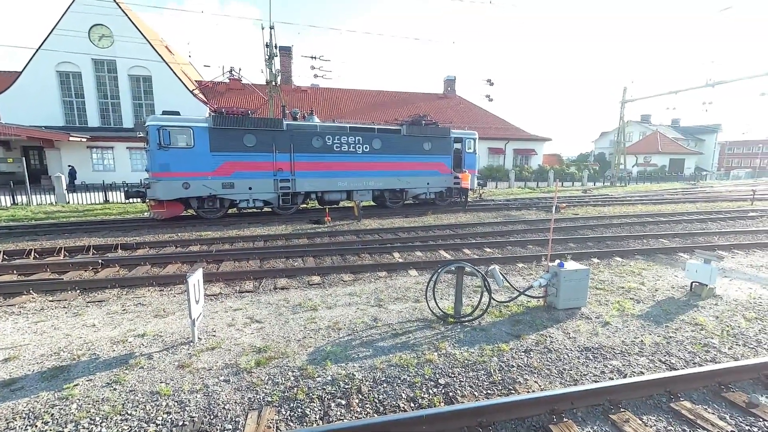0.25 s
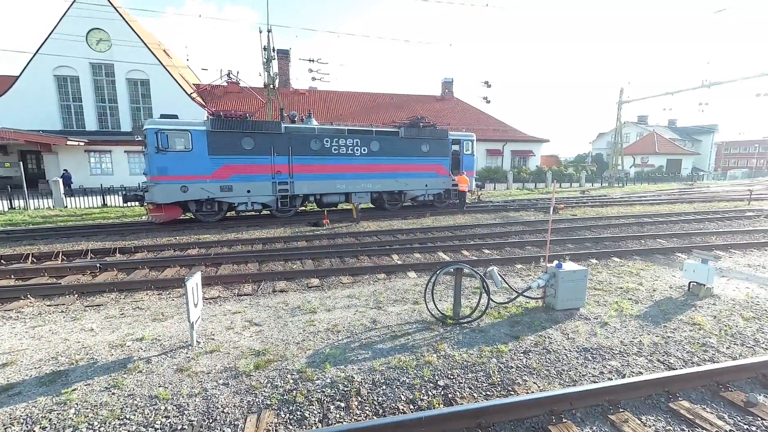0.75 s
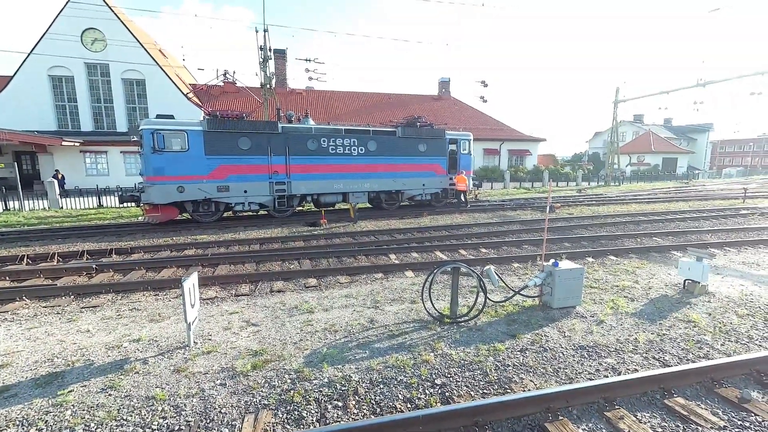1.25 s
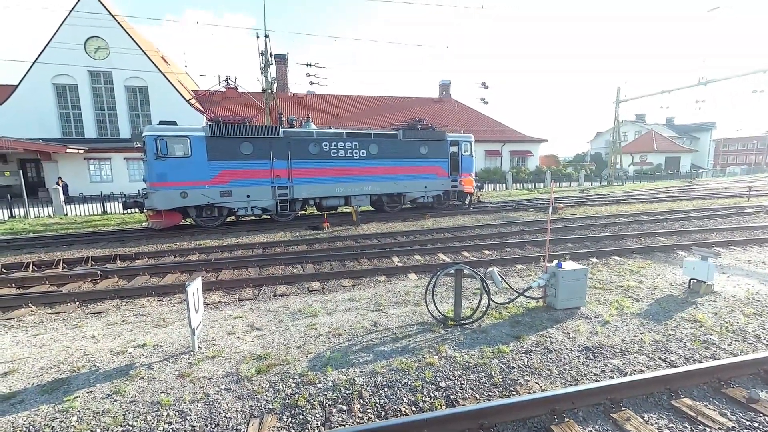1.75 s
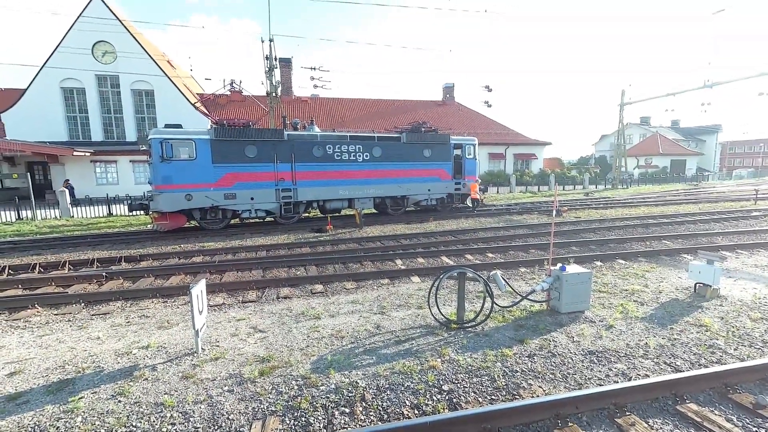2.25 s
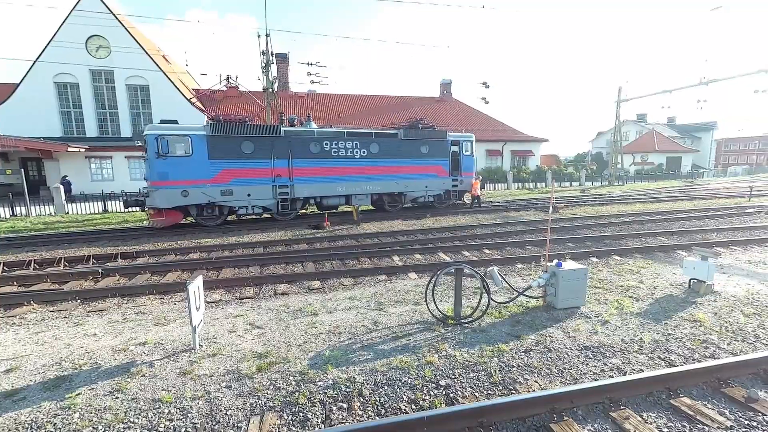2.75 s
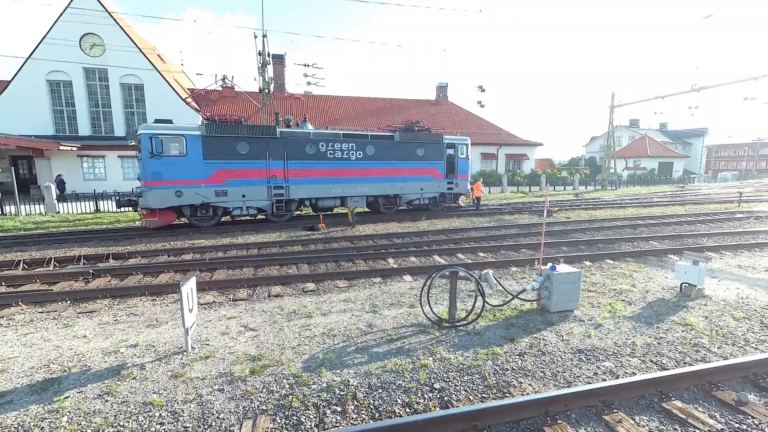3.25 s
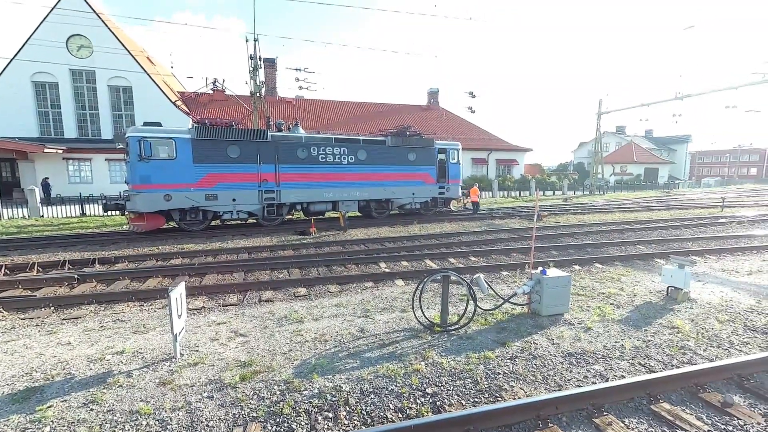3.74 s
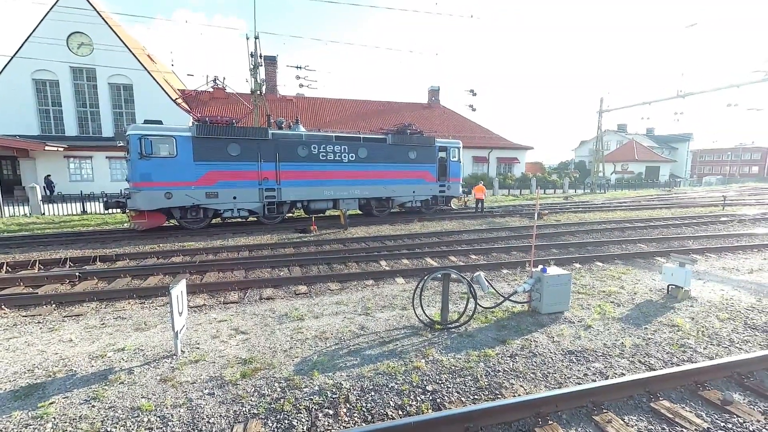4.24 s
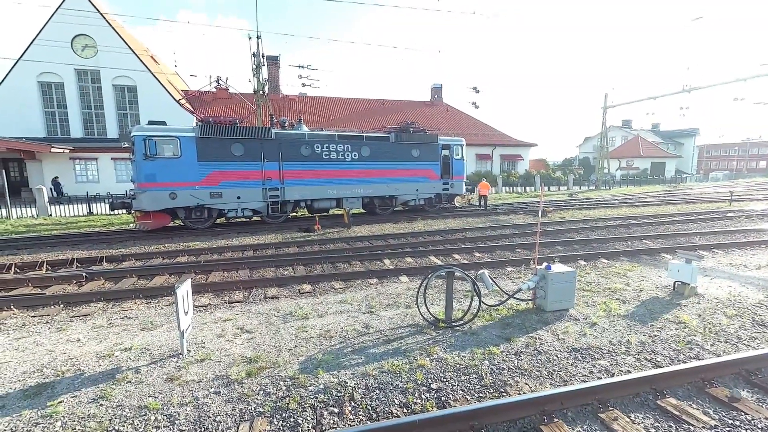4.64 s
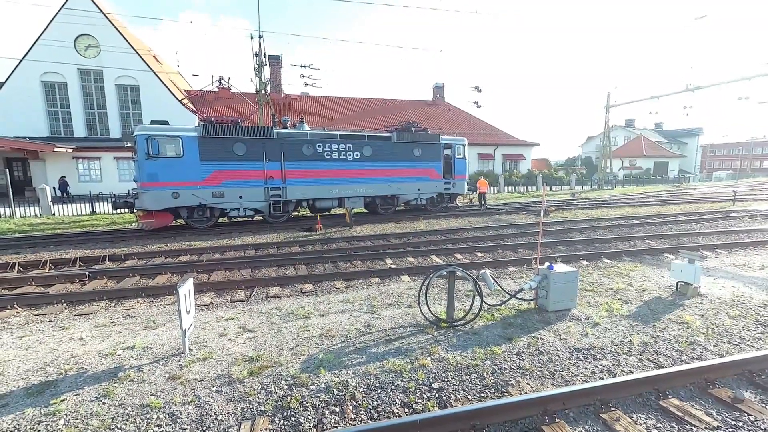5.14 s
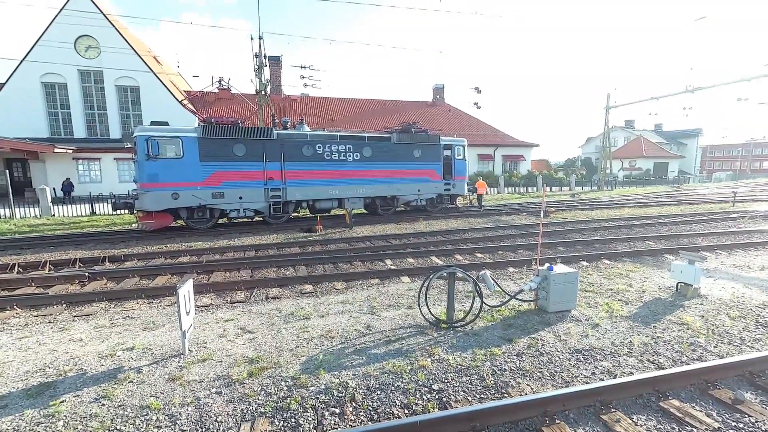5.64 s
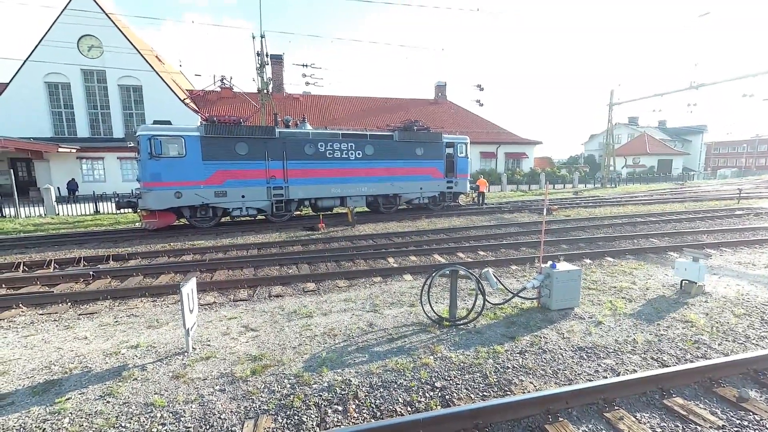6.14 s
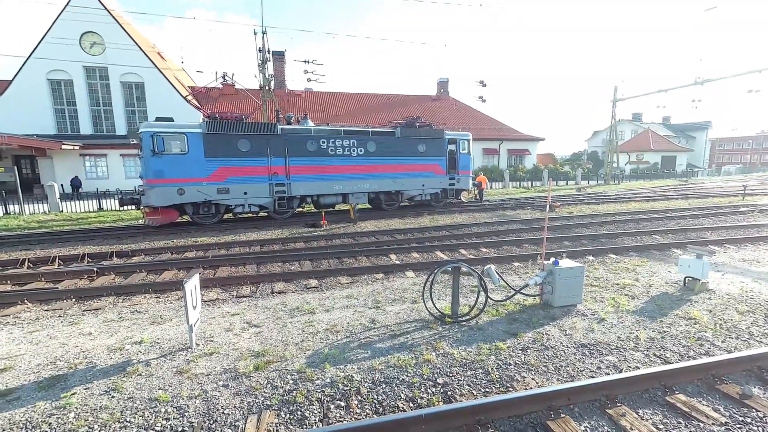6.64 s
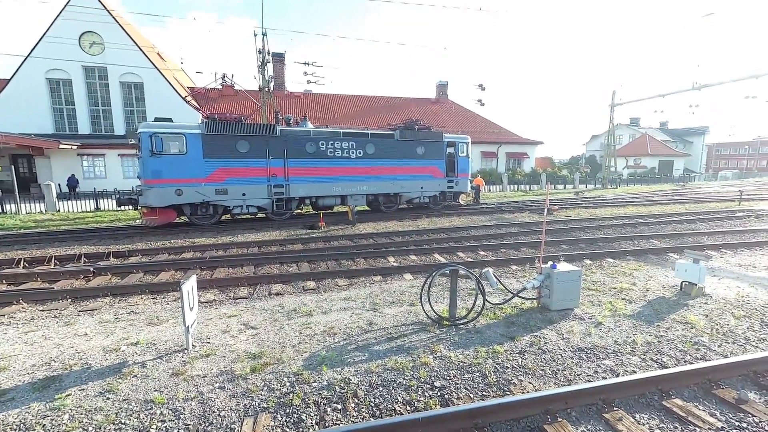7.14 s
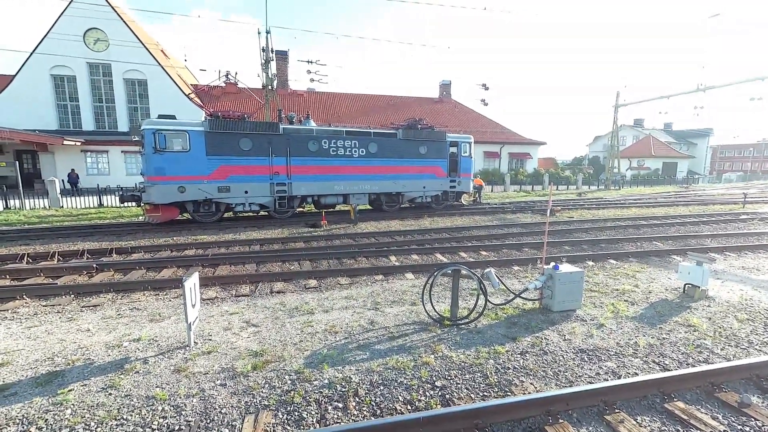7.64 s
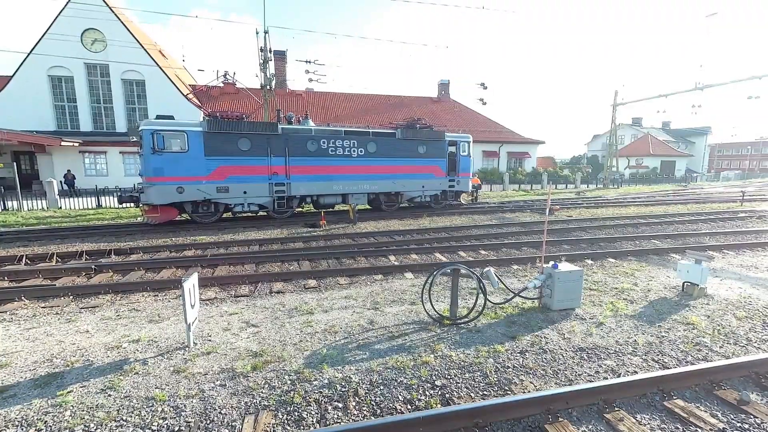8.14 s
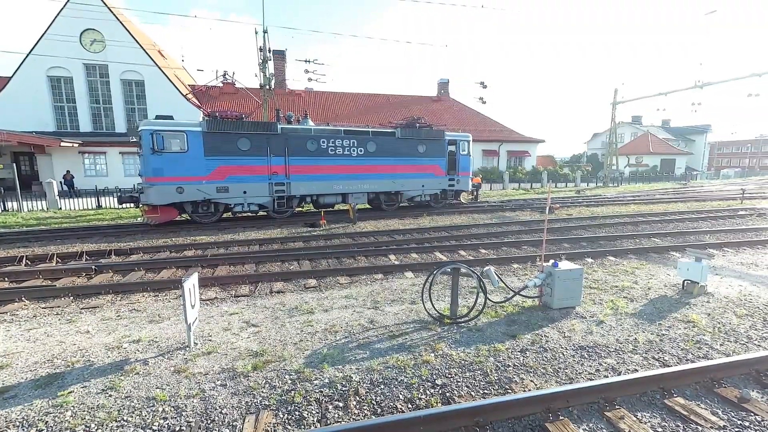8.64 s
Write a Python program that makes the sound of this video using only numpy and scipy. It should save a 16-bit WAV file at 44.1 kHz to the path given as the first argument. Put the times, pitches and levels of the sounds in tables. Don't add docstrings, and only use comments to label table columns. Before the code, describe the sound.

A parked electric locomotive's cooling fans roar steadily while an unseen braking train squeals to a stop and wind gusts batter the microphone.

```python
import sys
import numpy as np
from scipy import signal
from scipy.fft import irfft, next_fast_len
from scipy.io import wavfile
from scipy.ndimage import uniform_filter1d

SR = 44100
rng = np.random.default_rng(int(sys.argv[2]) if len(sys.argv) > 2 else 0)


def bounce(signal):
    frames = np.transpose(np.atleast_2d(signal))
    limited = np.clip(frames, -1, 1)
    pcm = np.round(limited * 32767).astype(np.int16)
    wavfile.write(sys.argv[1], SR, pcm)


def rack_gain(trim_db):
    fader = np.asarray(trim_db, float)
    return 10 ** (fader / 20)


N = 392049
T = np.arange(N) / SR
M = next_fast_len(N)
HZ = np.arange(M // 2 + 1) * SR / M + 1e-3
PORT_LAG_S = .0002
BASS_LAG_SHARE = 0.32

# f/Hz, likeness (0-1)
ALIKE = [(60, 0.04), (130, 0.63), (300, 0.95), (700, 0.97), (1400, 0.7), (2500, 0.02), (8000, 0.11)]


def over_hz(points):
    hz, value = np.transpose(points)
    return np.interp(np.log(HZ), np.log(hz), value)


def noise(gain):
    chance = rng.standard_normal(len(HZ)) + 1j * rng.standard_normal(len(HZ))
    return chance * gain * M / np.sqrt(4 * np.sum(gain ** 2))


def walk(rate_hz):
    hold = int(SR / rate_hz)
    steps = np.repeat(rng.standard_normal(N // hold + 1), hold)
    slewed = uniform_filter1d(uniform_filter1d(steps, hold), hold)
    return 1.7 * slewed[:N]


def resonance(hz, width_hz):
    return 1 / (1 + ((HZ - hz) / (width_hz / 2)) ** 2)


def ports(spectrum, gain, likeness, left_db):
    # f/Hz, level/dB
    shade = [(100, -2), (700, 2.5), (1400, 0), (1750, -8), (2400, -11.5), (4400, -3.5), (8000, -7.5),
             (15000, -7)]
    alike = np.clip(likeness, 0, 1)
    from_right = 1 / (1 + (1800 / HZ) ** 4)
    lag_s = PORT_LAG_S * (BASS_LAG_SHARE + (1 - BASS_LAG_SHARE) * from_right)
    delayed = spectrum * np.exp(-2j * np.pi * HZ * lag_s)
    left = alike * delayed + np.sqrt(1 - alike ** 2) * noise(gain)
    tilt = rack_gain((over_hz(shade) + left_db) / 2)
    norm = 2 / (tilt + 1 / tilt) * np.sqrt(2 / (1 + alike))
    return irfft(np.array([left * tilt, spectrum / tilt]) * norm, M)[:, :N]


def tone(table, flutter_db, wobble_hz, left_db, lag_s=PORT_LAG_S):
    s, hz, db = np.transpose(table)
    on = uniform_filter1d(((T > s[0]) & (T < s[-1])) * 1., size=2000)
    pitch_hz = np.interp(T, s, hz) + wobble_hz * walk(15)
    phase = 2 * np.pi * np.cumsum(pitch_hz) / SR
    size = np.sqrt(2) * on * rack_gain(np.interp(T, s, db) + flutter_db * walk(8.1))
    left = rack_gain(left_db) * np.sin(phase - 2 * np.pi * hz[0] * lag_s)
    return size * np.array([left, np.sin(phase)]) * 2 / (1 + rack_gain(left_db))


def airflow(points, db, flicker_db, swell_db):
    colour, out = rack_gain(over_hz(points)), 0
    for centre in 30 * 2. ** np.arange(10):
        gain = colour * np.cos(np.pi / 2 * np.clip(np.log2(HZ / centre), -1, 1))
        share = np.sqrt(np.sum(gain ** 2) / np.sum(colour ** 2))
        band = ports(noise(gain), gain, over_hz(ALIKE), 0)
        out = out + share * band * rack_gain(swell_db + flicker_db * walk(8))
    return out * rack_gain(db)


def blower():
    # f/Hz, level/dB per Hz
    roar = [(18, -68.5), (30, -34), (122, -9.5), (150, -6), (184, -4), (238, -3), (288, 0), (427, -9),
            (690, -11.5), (805, -7), (939, -16.5), (1170, -20), (1800, -31), (2340, -54.5), (3960, -120)]
    # f/Hz, level/dB per Hz
    hiss = [(1000, -27), (1700, -6.5), (1750, -19.5), (2260, -4.5), (2780, -14.5), (3700, -15.5),
            (4660, -21.5), (5310, -25), (6940, -28.5), (8270, -27), (11000, -31), (12200, -34),
            (15500, -39.5)]
    # f/Hz, width/Hz, level/dB
    ducts = [
        (241.8, 82, -26),
        (164.5, 27, -33.5),
        (611, 130, -33.5),
        (1630, 27, -51.5),
        (3480, 120, -66.5),
        (1960, 92, -56),
    ]
    # t/s, level/dB
    blade = [
        (0, -44),
        (.6, -38),
        (1, -30),
        (1.4, -33),
        (4.6, -35),
        (5.9, -32.5),
        (6.3, -34.5),
        (8.3, -32),
        (8.89, -40),
    ]
    swell_db = 0.22 * walk(0.86)
    out = airflow(roar, db=-23.5, flicker_db=1.22, swell_db=swell_db)
    out = out + airflow(hiss, db=-47.5, flicker_db=0.87, swell_db=swell_db)
    for hz, width_hz, db in ducts:
        gain = resonance(hz, width_hz)
        out = out + ports(noise(gain), gain, over_hz(ALIKE), 0) * rack_gain(db + 1.47 * walk(5))
    blade_hz = 818.3
    steady = [(s, blade_hz, db) for s, db in blade]
    return out + tone(steady, flutter_db=1.2, wobble_hz=.5, left_db=1.2, lag_s=BASS_LAG_SHARE * PORT_LAG_S)


def follow(level_db, share, dies_s, dies_db_per_s):
    # t/s, level/dB
    effort = [
        (0, -5),
        (1.1, -3),
        (1.6, -1),
        (2.1, -2),
        (2.9, 0.3),
        (3.5, -0.5),
        (4, -5.5),
        (4.6, -9),
        (6, -21),
    ]
    return level_db + share * np.interp(T, *np.transpose(effort)) - dies_db_per_s * np.maximum(T - dies_s, 0)


def wheels(rings, bed, bed_db, left_db):
    gain = rack_gain(over_hz(bed))
    out = ports(noise(gain), gain, .5, left_db) * rack_gain(bed_db + .9 * walk(6))
    for hz, width_hz, db, start, end in rings:
        gain = resonance(hz, width_hz)
        sings = np.clip(np.minimum(T - start, end - T) / .15 + .5, 0, 1)
        patchy_db = 1.2 * walk(4) + 1.8 * walk(14) - 10 * (1 - sings)
        out = out + ports(noise(gain), gain, 0.22, left_db) * rack_gain(db + patchy_db)
    return out / np.std(out.mean(axis=0))


def train():
    # f/Hz, width/Hz, level/dB, from t/s, to t/s
    low_rings = [
        (1370, 70, -2.5, 0, 4),
        (1450, 30, -8, 0, 4),
        (2040, 45, -9, 0, 4.3),
        (950, 90, -1, 0, 4),
    ]
    mid_rings = [(4020, 50, -1, 1.25, 2.1), (4030, 55, -2, 2.8, 3.7), (5490, 40, -7, 0, 3.9),
                 (5630, 70, -4, 0, 3.9), (5820, 65, -3.5, 0, 4.8), (5970, 45, -7, 1.2, 4.8),
                 (6220, 60, -9, 1.2, 3.6), (6530, 50, -7, 1.2, 3.5), (6615, 50, -7, 1.2, 3.5),
                 (7590, 35, -8, 0, 3.9), (7880, 50, -7, 1.2, 3.9), (8020, 60, -7, 0, 3.9),
                 (8190, 85, -4, 0, 4.7), (8600, 110, -6, 4.6, 6)]
    top_rings = [(9050, 60, -8, 1.3, 2.2), (10100, 200, -3, 1.2, 3.6), (10550, 200, -6, 1.2, 3.6),
                 (10800, 60, -7, 0, 3.6), (11000, 110, -4, 0, 3.9), (11150, 130, -1, 4, 4.9),
                 (11600, 90, -6, 3.7, 4), (13400, 200, -3, 3.7, 4.75), (14200, 300, -6, 3.6, 4)]
    # t/s, level/dB
    squeal = [
        (.06, -46.5),
        (1.1, -48.5),
        (1.6, -42.5),
        (2.2, -40.5),
        (2.32, -47),
        (2.8, -47),
        (3.72, -40.5),
        (3.78, -49),
        (4.05, -51),
    ]
    # t/s, f/Hz, level/dB
    second_squeal = [
        (2.3, 2466, -55),
        (2.6, 2428, -47),
        (3, 2440, -47),
        (3.4, 2430, -59),
        (3.85, 2490, -53),
    ]
    low = rack_gain(follow(-40.5, share=0.83, dies_s=7, dies_db_per_s=28))
    mid = rack_gain(follow(-45, share=1.01, dies_s=5.5, dies_db_per_s=4))
    top = rack_gain(follow(-50.5, share=0.96, dies_s=4.5, dies_db_per_s=12.5))
    # f/Hz, level/dB per Hz
    low_bed = [(700, -20), (1300, -1), (2300, -8), (3200, -25), (6000, -60)]
    mid_bed = [(1500, -43), (2700, -27.0), (4000, 0.5), (4400, -7.0), (5300, -4), (5600, 1.5),
               (6900, 1.0), (8300, -0.5), (8800, -12.5), (12000, -42)]
    top_bed = [(6000, -42.5), (8800, -6.0), (9700, -6.5), (10300, -4.5), (11800, -6.0), (15500, -12)]
    out = low * wheels(low_rings, low_bed, bed_db=0, left_db=-1.5)
    out = out + mid * wheels(mid_rings, mid_bed, bed_db=8, left_db=-2.5)
    out = out + top * wheels(top_rings, top_bed, bed_db=6.5, left_db=-4.5)
    out = out * np.clip((6.3 - T) / .4, 0, 1)
    squeal_hz, sag_hz_per_s = 2466, 3.2
    sagging = [(s, squeal_hz - sag_hz_per_s * s, db) for s, db in squeal]
    out = out + tone(sagging, flutter_db=1, wobble_hz=1, left_db=-22)
    return out + tone(second_squeal, flutter_db=2, wobble_hz=2, left_db=-20)


def bells(s, db, ms, steep, rise):
    coarse = T[::32]
    late = (coarse - s[:, None]) * 1000 / ms[:, None]
    shape = np.exp(-np.where(late > 0, late, -late / rise) ** steep)
    power = rack_gain(db[:, None]) ** 2 * shape
    return np.interp(T, coarse, np.sqrt(power.sum(axis=0)))


def eddies(points, even, span_s):
    x = irfft(noise(rack_gain(over_hz(points))), M)[:N]
    power = uniform_filter1d(x ** 2, int(span_s * SR))
    x = x / power ** (np.clip(even, 0, 1) / 2)
    return x / np.std(x)


def wind(puffs, cracks, rasp_db, swirl_db):
    # f/Hz, level/dB per Hz
    buffet_colour = [(25, -39), (60, -13), (110, 0.5), (170, 11.5), (240, 13), (350, 7.5), (500, -7.5),
                     (800, -38.5), (2000, -85.5)]
    rasp_colour = [(200, -14.5), (450, 2.5), (700, -4), (1000, -14), (1500, -34.5), (2500, -40.5),
                   (5000, -48), (15000, -96.5)]
    crack_colour = [(200, -29), (500, -6), (900, 6.5), (1400, -3), (2300, -29), (4000, -51), (15000, -89.5)]
    edge_colour = [(1000, -24), (2600, 2.5), (4000, -9.5), (7000, -15.5), (15000, -32)]
    s, db, ms, swirl_ms = np.transpose(cracks)
    thud = bells(*np.transpose(puffs), steep=3.5, rise=.85)
    crack = bells(s, db, ms, steep=2.5, rise=.4)
    edge = bells(s, -25.5 + 0.7 * db, ms, steep=2.5, rise=.4)
    swirl = bells(s, swirl_db + 0.33 * db, swirl_ms, steep=3.5, rise=.85)
    rasp = np.hypot(rack_gain(rasp_db) * thud, swirl) * rack_gain(2 * walk(60))
    edge = edge * rack_gain(5 * walk(400) - 6)
    push = thud * eddies(buffet_colour, even=0.32, span_s=0.02)
    push = push + rasp * eddies(rasp_colour, even=0.18, span_s=0.0044)
    out = rack_gain(1.0) * push + crack * eddies(crack_colour, even=.8, span_s=.004)
    return out + edge * eddies(edge_colour, even=.5, span_s=.002)


def gusts():
    # t/s, level/dB, half
    # length/ms
    puffs_left = [(0.004, -11, 5), (.031, -14.5, 6), (0.113, -13, 6), (.15, -21, 30), (.338, -16, 6),
                  (0.462, -12, 5.4), (.49, -19, 25), (0.643, -11.5, 16), (0.963, -20, 146),
                  (2.984, -17, 35), (3.074, -17.5, 44), (3.182, -21, 18), (3.569, -14, 11.4),
                  (3.683, -14.5, 29), (3.78, -17.5, 22), (4.001, -21.5, 136), (4.855, -12, 19),
                  (5.346, -22, 35), (6.136, -21, 166)]
    puffs_right = [(0.096, -4, 7.1), (0.15, -16, 26), (0.254, -13.5, 17), (0.49, -16.5, 50),
                   (0.64, -11.5, 32), (0.858, -11, 16), (.898, -13.5, 8.4), (0.932, -3.5, 12.7),
                   (1.015, -12.5, 24), (1.041, -5.5, 9.3), (1.115, -19.5, 43), (1.925, -20.5, 47),
                   (2.309, -3.5, 8.4), (2.39, -8.5, 18), (2.43, -18, 16), (2.59, -13, 5.8),
                   (2.704, -15.5, 9), (2.633, -7, 18), (2.785, -5, 26), (2.989, -16, 22), (3.289, -12, 39),
                   (3.66, -19, 81), (3.916, -7, 17.5), (4.131, -9, 27), (4.265, -17.5, 71),
                   (4.861, -2.5, 7.8), (4.955, -6.5, 62), (5.043, 0.5, 16), (5.112, -6.5, 54),
                  (5.229, -5.5, 65), (5.343, -9, 18), (5.389, -6.5, 8.6), (5.442, -6, 11),
                  (6.109, -4.5, 14), (6.173, 0.5, 12), (6.258, -6.5, 69), (6.37, -5.5, 11),
                  (6.485, -3.5, 79), (6.625, -6, 85), (6.796, -7, 56), (6.954, -5, 48), (7.045, -6.5, 21),
                  (7.2, -18, 114), (7.392, -9, 70), (7.508, -11.5, 71), (7.667, -13, 30), (7.837, -10, 47),
                  (7.953, -5.5, 46), (8.152, -8.5, 136), (8.275, -5.5, 52), (8.39, -7, 57),
                  (8.477, -11, 36), (8.605, -10.5, 44), (8.689, -6, 30), (8.81, -13, 68)]
    # t/s, level/dB, half length/ms, half length of the swirl round it/ms
    cracks_left = [
        (.628, -25, 3.5, 20),
        (1.132, -18, 3, 15),
        (3.092, -30, 6, 30),
        (3.678, -24, 5, 25),
    ]
    cracks_right = [(0.931, -11.5, 2.9, 8.2), (2.765, -9, 4.5, 12), (2.78, -15.5, 5, 19),
                    (4.129, -35, 10, 21), (4.902, -19, 6, 14), (4.929, -13, 6, 36), (4.975, -16.5, 5.6, 18),
                    (5.024, -13.5, 14, 27), (5.097, -17, 6, 24.5), (5.22, -25.5, 5.3, 25),
                    (5.246, -19, 10, 32), (6.164, -14.5, 5.6, 15), (6.23, -14, 8.5, 18),
                    (6.254, -8.5, 7.4, 24), (6.288, -17, 5.2, 30), (6.426, -13.5, 12, 24),
                    (6.506, -19.5, 6.7, 35), (6.546, -15, 14, 30), (6.626, -21, 8.1, 22),
                    (6.768, -22.5, 11, 29), (6.922, -24.5, 5.8, 17), (6.952, -15.5, 6.8, 30),
                    (7.047, -30, 5, 24), (7.387, -23.5, 6.4, 36), (7.942, -22.5, 6.5, 21),
                    (7.975, -29, 11, 14), (8.062, -30.5, 9.7, 40), (8.243, -18.5, 9.1, 16),
                    (8.298, -15.5, 6, 18)]
    swirl_db, shelter_db = -6.5, -12
    left = wind(puffs_left, cracks_left, rasp_db=-12.5, swirl_db=swirl_db + shelter_db)
    right = wind(puffs_right, cracks_right, rasp_db=-15, swirl_db=swirl_db)
    return np.array([left, right])


def scene():
    capsule_hiss = rack_gain(-63) * rng.standard_normal((2, N))
    return blower() + train() + gusts() + capsule_hiss


def top_cut(x):
    return signal.sosfilt(signal.butter(12, 15670, fs=SR, output="sos"), x)


def record(dry):
    knee, ceiling = 12, 1.08
    bent = dry / (1 + np.abs(dry / ceiling) ** knee) ** (1 / knee)
    return top_cut(np.clip(bent, -1, 1))


dry = scene()
out = record(dry)
bounce(out)
```